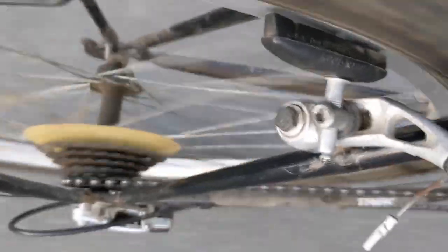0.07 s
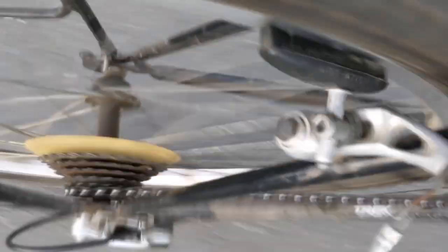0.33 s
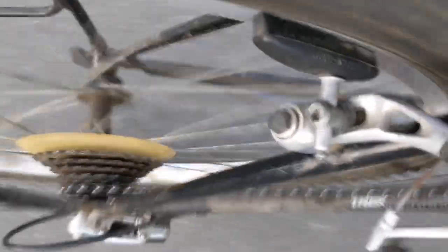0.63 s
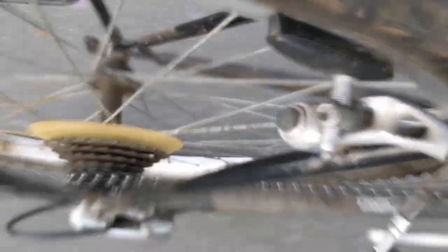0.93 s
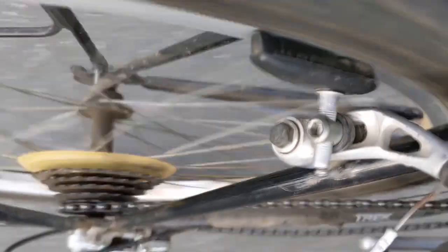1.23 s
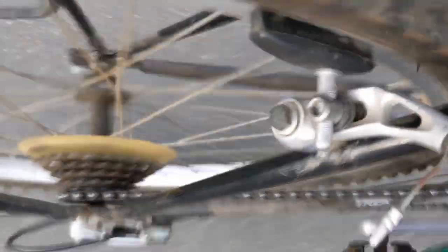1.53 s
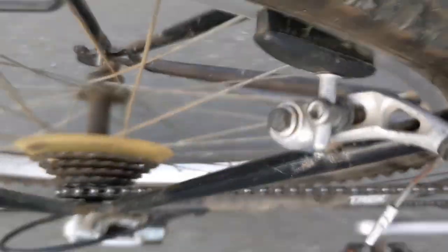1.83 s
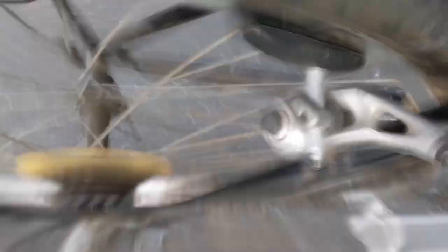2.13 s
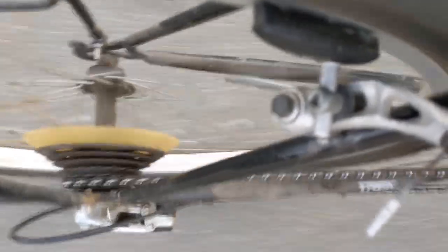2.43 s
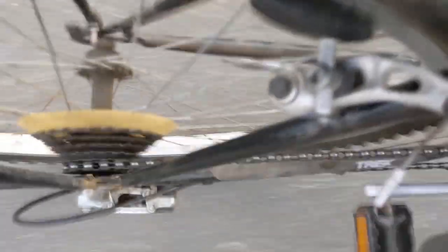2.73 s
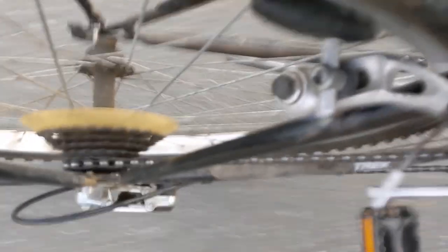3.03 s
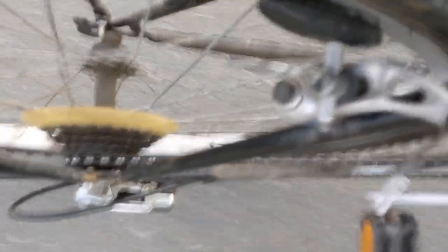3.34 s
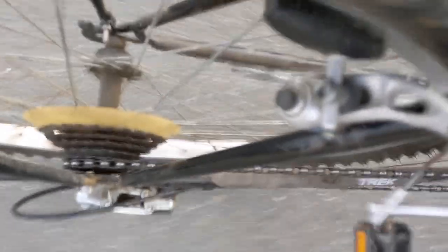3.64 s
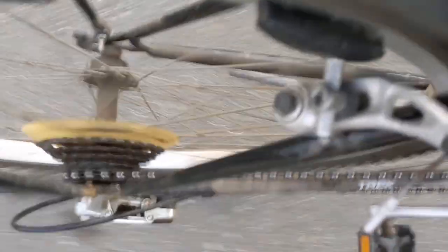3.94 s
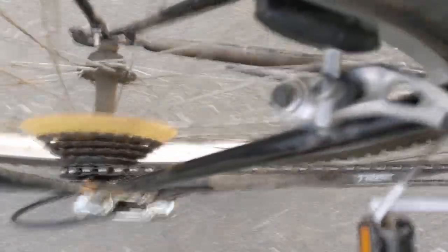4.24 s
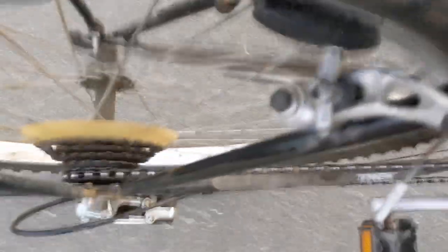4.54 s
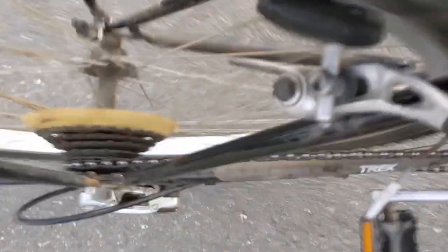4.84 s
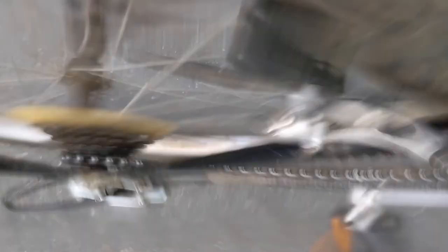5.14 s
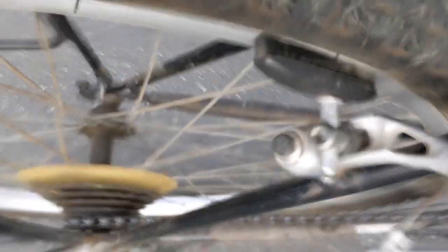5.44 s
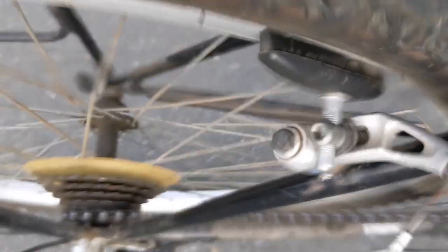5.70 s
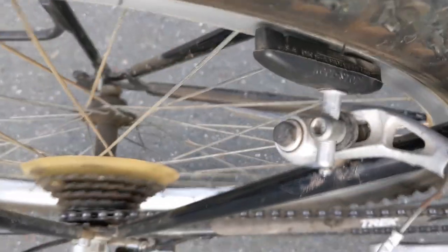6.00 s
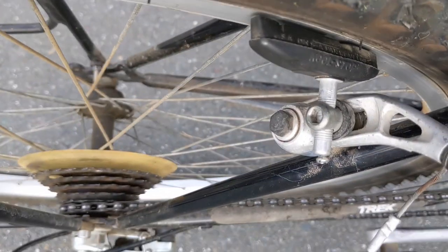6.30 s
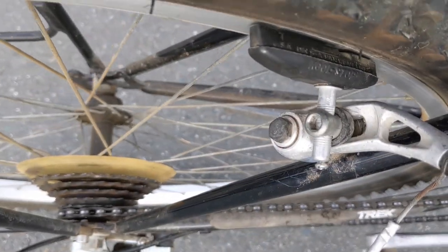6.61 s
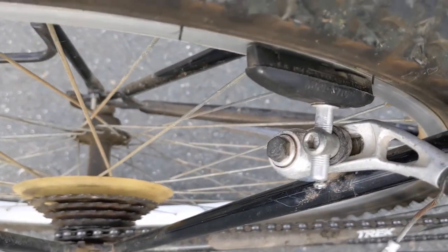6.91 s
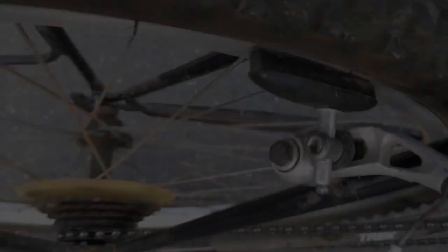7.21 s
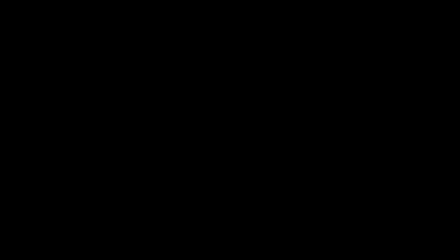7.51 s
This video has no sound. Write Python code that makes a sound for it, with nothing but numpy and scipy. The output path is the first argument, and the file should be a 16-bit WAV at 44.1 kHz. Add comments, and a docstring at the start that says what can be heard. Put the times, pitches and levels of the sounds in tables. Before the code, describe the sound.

A bicycle coasts over pavement, heard close to the rear wheel. From the start, wind buffets the microphone in low, uneven gusts, mostly on the left, while the freewheel ticks quickly and faintly and the loose chain jingles toward the right. The brake pad rubs the rim five times with a gritty hiss, at about 0.7, 1.5, 2.7, 4.2 and 5.4 seconds, each lasting between a third of a second and a second. Bumps slap the chain against the frame with a steely clatter, near 1.1 seconds, in a cluster just after 2, at 3.7 and again from 4.8 to 5.2. The ticking slows slightly and stops just before 6 seconds as the wind dies. Quiet outdoor air remains, with soft puffs, faint swishes and a few small clicks. After 7 seconds come a brief scratch, a sharp finger knock on the microphone and a last click.

```python
"""A bicycle coasts over pavement with the microphone held beside its rear wheel.
From the start, wind buffets the microphone's two openings (ports), the freewheel ticks
and the loose chain jingles. Then the brake pad rubs the rim five times, while bumps throw
the chain against the frame. The ticking slows and the bicycle stops. Last come soft puffs
and swishes, a few small clicks and the knocks of fingers on the microphone's case."""
import sys
import numpy as np
from scipy import signal
from scipy.fft import rfft, irfft, next_fast_len
from scipy.io import wavfile

SR = 44100
rng = np.random.default_rng(int(sys.argv[2]) if len(sys.argv) > 2 else 0)


def wav_record(signal):
    """Record a signal, one row per channel, as 16-bit PCM in the file named by sys.argv[1]."""
    frames = np.transpose(np.atleast_2d(signal))
    bounded = np.clip(frames, -1, 1)
    # unit amplitude maps onto the largest positive 16-bit level
    quanta = np.round(bounded * 32767).astype(np.int16)
    wavfile.write(sys.argv[1], SR, quanta)


N = 337806
TIME, FREQS = np.arange(N) / SR, np.fft.rfftfreq(next_fast_len(N), 1 / SR)
LEFT, RIGHT = 0, 1
SIDES = np.array([[.5], [-.5]])   # shares out a pan_db: above 0 leans left, below 0 leans right


def from_db(db):
    """Turn decibels into a number to multiply by."""
    return 10 ** (np.asarray(db) / 20)


def unit_power(x):
    """Scale a signal so its average power is 1."""
    return x / np.sqrt(np.mean(x ** 2) + 1e-20)


def in_time(rows):
    """Join a table's points in time with straight lines, one curve per column."""
    times, *columns = np.transpose(rows)
    return [np.interp(TIME, times, column) for column in columns]


def at_hz(points):
    """Join a table's points along the pitch axis, every octave equally wide."""
    pitches, values = np.transpose(points)
    return np.interp(np.log(FREQS + 1), np.log(pitches), values)


def filtered(x, response):
    """Make each frequency louder or softer."""
    size = next_fast_len(N)
    return irfft(rfft(x, size) * response, size)[..., :N]


def pass_filter(x, hz, kind, order):
    """Keep the "low" or the "high" side of a frequency."""
    return signal.sosfilt(signal.butter(order, hz, kind, fs=SR, output="sos"), x)


def white():
    """Separate white noise for left and right."""
    return rng.standard_normal((2, N))


def drift(rate_hz):
    """A smooth random wobble for each side, about 1 in size."""
    return unit_power(filtered(white(), 1 / (1 + (FREQS / rate_hz) ** 2)))


def colour(spectrum, balance, body=1):
    """A stereo filter made of a tone colour, a lean to one side and a ringing body."""
    response = from_db(at_hz(spectrum) + SIDES * at_hz(balance)) * body
    return response / np.sqrt(np.mean(np.abs(response) ** 2))


def held(start_s, length_s, rise_s, fall_s):
    """Rise from 0 to 1, hold, and fall back."""
    end_s = start_s + length_s
    return np.interp(TIME, [start_s - rise_s, start_s, end_s, end_s + fall_s], [0, 1, 1, 0])


def spells(rest_db, rows, rise_s, fall_s):
    """A level in dB that leaves its rest for each row, slides evenly and falls back."""
    level = rest_db
    for start_s, length_s, first_db, last_db in rows:
        slide = np.interp(TIME, [start_s, start_s + length_s], [first_db, last_db])
        level = level + held(start_s, length_s, rise_s, fall_s) * (slide - level)
    return level


# loudness of the outdoor air and tyres: time_s, level_db
STREET_LEVEL = [(5.85, -53), (6.5, -49.5), (7.2, -50), (7.58, -63)]
# their tone colour: pitch_hz, level_db
STREET_COLOUR = [(200, 4.5), (400, 6), (850, 6), (1600, -0.5), (4000, -10.5), (16000, -12.5)]
# their lean to one side: pitch_hz, pan_db
STREET_BALANCE = [(500, 1.5), (9000, -2)]

def street():
    """The open air and the tyres make a soft, steady noise."""
    return from_db(in_time(STREET_LEVEL)[0]) * filtered(white(), colour(STREET_COLOUR, STREET_BALANCE))


# soft swishes as the bicycle rolls out: middle_s, half_length_s, level_db
SWISHES = [(6.092, 0.036, -50.5), (6.228, 0.04, -50), (6.493, 0.072, -51), (7.04, 0.11, -53.5)]

def swishes(centre_hz):
    """Faint hisses swell and fade."""
    swell = sum(from_db(db) * np.exp(-.5 * ((TIME - s) / half_s) ** 2) for s, half_s, db in SWISHES)
    return swell * unit_power(filtered(white(), FREQS / (FREQS ** 2 + centre_hz ** 2)))


def closing_noise_burst(start_s, length_s, level_db, dull_hz):
    """A short, dull burst of noise at the very end."""
    noise = unit_power(filtered(white(), 1 / (1 + FREQS / dull_hz)))
    return from_db(level_db) * held(start_s, length_s, rise_s=0.0026, fall_s=.01) * noise


def grip_scratch(level_db, centre_hz):
    """The grip on the microphone shifts: a gritty scratch, then a fainter one."""
    stroke = np.interp(TIME, [7.114, 7.126, 7.138, 7.168, 7.185], [0, 1, .25, .4, 0])
    grit = white() * unit_power(from_db(6 * np.tanh(drift(190)[0])))
    band = 1 / (1 + (2 * np.log2((FREQS + 1) / centre_hz)) ** 4)   # one octave wide
    return from_db(level_db) * stroke * unit_power(filtered(grit, band))


# ticks of the drivetrain and the grip: start_s, peak_db, low_edge_hz, high_edge_hz, pan_db
CLICKS = [(5.949, -28.5, 2980, 14200, -6), (6.2739, -25, 600, 9000, -8), (6.664, -40, 6500, 13900, -19),
          (6.7821, -24, 5100, 14100, -22), (7.1258, -17.5, 2880, 4830, -1), (7.165, -19.5, 2900, 8000, -1),
          (7.172, -23, 2900, 7900, 2), (7.391, -12, 2300, 5400, -1)]

def clicks(rattle_db, decay_s):
    """A sharp tap on a small part, then a short rattle, with no bass."""
    out, age = np.zeros((2, N)), TIME[:4096]
    rattle = from_db(rattle_db - 60 * age / decay_s) + from_db(-31.5 - 60 * age / 0.18)
    for start_s, peak_db, low_hz, high_hz, pan_db in CLICKS:
        contact = rattle * rng.standard_normal((2, len(age)))
        contact[:, 0] += 1   # the tap itself
        click = pass_filter(contact, low_hz, "high", order=4)
        click = pass_filter(click, high_hz, "low", order=1)
        at = int(start_s * SR)
        out[:, at:at + len(age)] += click / np.abs(click).max() * from_db(peak_db + SIDES * pan_db)
    return out


# fingers knock on the microphone's case: start_s, peak_db, hardness_hz
KNOCKS = [(6.2754, -30, 1290), (7.2902, -23.5, 593), (7.328, -5.5, 3200)]
# the case's short-lived tones: pitch_hz, width_hz, level_db
CASE_TONES = [(1130, 660, 7.5), (2300, 1100, 7), (4440, 900, -6)]

def finger_knocks(rattle_db, decay_s, bass_cut_hz):
    """A blunt knock makes the case ring for a moment, the same on both sides."""
    out, age = np.zeros(N), TIME[:4096]
    for start_s, peak_db, hardness_hz in KNOCKS:
        contact = from_db(rattle_db - 60 * age / decay_s) * rng.standard_normal(len(age))
        contact[0] += 1
        contact = pass_filter(contact, hardness_hz, "low", order=2)
        contact = pass_filter(contact, bass_cut_hz, "high", order=2)
        knock = sum(from_db(db) * signal.lfilter(*signal.iirpeak(hz, hz / width_hz, fs=SR), contact)
                    for hz, width_hz, db in CASE_TONES)
        at = int(start_s * SR)
        out[at:at + len(age)] += from_db(peak_db) * knock / np.abs(knock).max()
    return out


# stray puffs of air as the bicycle comes to rest: start_s, strength_db
PUFFS = [(5.899, -28.5), (6.059, -34.5), (6.296, -32.5), (6.382, -31), (6.649, -39)]

def air_puffs(level_db, swell_s, dull_hz, pan_db):
    """Single slow swirls of air thump softly on one port."""
    swell = np.zeros(N)
    for start_s, strength_db in PUFFS:
        age = np.maximum(TIME - start_s, 0) / swell_s
        swell += from_db(strength_db) * age * np.exp(1 - age)
    bass = FREQS / np.hypot(FREQS, 40) / (1 + (FREQS / dull_hz) ** 3)
    return from_db(level_db + SIDES * pan_db) * unit_power(filtered(white(), bass)) * swell


# the smooth flow of air, which rises and dies with the ride: time_s, left_db, right_db
AIRFLOW = [(0, -18, -26), (1.2, -29, -24.5), (1.8, -2.5, -22.5), (2.2, -21, -30), (2.7, -13, -19.5),
           (3.8, -18, -26.5), (4.3, -13, -31), (4.55, -31, -29), (5.3, -25.5, -34), (5.75, -42, -27),
           (6.05, -52, -40.5), (7.1, -47.5, -47.5), (7.55, -61, -56)]
# gusts: start_s, length_s, rumble_db, buffet_db (how rough it is), port
GUSTS = [(0.16, 0.013, -21, -9.5, LEFT), (0.288, 0.87, -21.5, -6.5, LEFT), (0.93, 0.2, -17.5, -8, LEFT),
         (1.249, 0.048, -19, -1.5, LEFT), (1.325, 0.25, -15, -8, LEFT), (1.597, 0.055, -15, -9, LEFT),
         (1.713, 0.019, -15.5, -5.5, LEFT), (1.764, 0.2, -9, -17, LEFT), (2.291, 0.22, -12.5, -8, LEFT),
         (2.538, 0.025, -21, 2, LEFT), (2.689, 0.24, -15.5, -6.5, LEFT), (2.964, 0.34, -13, -6, LEFT),
         (3.373, 0.18, -16, -9, LEFT), (3.625, 0.094, -18, -8, LEFT), (3.841, 0.072, -12, -11, LEFT),
         (3.92, 0.11, -10, -18.5, LEFT), (4.07, 0.0089, -15.5, -13.5, LEFT),
         (4.222, 0.17, -14.5, -13, LEFT), (4.968, 0.26, -20, -18.5, LEFT), (5.909, 0.027, -28, -22, LEFT),
         (1.36, 0.078, -13, -22.5, RIGHT), (1.986, 0.017, -18, -11.5, RIGHT),
         (2.279, 0.2, -13, -19.5, RIGHT), (2.642, 0.1, -13.5, -23, RIGHT),
         (3.077, 0.21, -19.5, -16.5, RIGHT), (4.917, 0.018, -10.5, -28.5, RIGHT)]

def airflow(calm_buffet_db):
    """Rumble and buffeting at each port, in dB; a gust buffets hardest as it arrives."""
    rumble, buffet = np.array(in_time(AIRFLOW)), np.full((2, N), float(calm_buffet_db))
    for start_s, length_s, rumble_db, buffet_db, port in GUSTS:
        gust = held(start_s, length_s, rise_s=0.011, fall_s=0.051)
        front_db = 4.5 * np.exp(-np.maximum(TIME - start_s, 0) / 0.048)
        rumble[port] += gust * (rumble_db - rumble[port])
        buffet[port] += gust * (buffet_db + front_db - buffet[port])
    return rumble, buffet


# tone colour of the wind: pitch_hz, level_db
WIND_COLOUR = [(20, -0.5), (45, 1), (80, -1), (150, -4.5), (300, -12), (600, -17), (1000, -24.5),
               (1600, -37.5), (3000, -57), (6000, -84.5)]

def wind(flutter_db, swirl_db, usual_buffet_db, calm_buffet_db):
    """Swirls of air strike each port; sharper swirls sound brighter, and the whole flow flutters."""
    rumble_db, buffet_db = airflow(calm_buffet_db)
    sharpness_db = buffet_db - usual_buffet_db + swirl_db * np.tanh(drift(140))
    shape = unit_power(from_db(at_hz(WIND_COLOUR)) * FREQS / np.hypot(FREQS, 15))
    air, out = filtered(white(), shape), 0
    centres = np.log(60 * 2. ** np.arange(6))   # six octaves, from 60 Hz up
    for k, share in enumerate([.1, .25, .7, 1, 1.2, 1.35]):   # high octaves follow sharpness most
        octave = np.interp(np.log(FREQS + 1), centres, np.arange(len(centres)) == k)
        out = out + filtered(air, octave) * from_db(share * sharpness_db)
    return out * from_db(rumble_db + flutter_db * np.tanh(drift(28)))


# the freewheel ticks more slowly as the wheel loses speed: time_s, ticks_per_s, level_db
FREEWHEEL = [(0.3, 49.8, -39.5), (1.3, 45.6, -39), (3.9, 40.9, -34), (5.4, 38.6, -35)]

def freewheel(one_tick_at_s, stop_s, decay_s, pan_db, uneven_db):
    """Small catches drop over the ratchet's teeth in thin ticks, no two equally strong."""
    ticks_per_s, level_db = in_time(FREEWHEEL)
    teeth_passed = np.cumsum(ticks_per_s) / SR
    since_tick_s = (teeth_passed - teeth_passed[int(one_tick_at_s * SR)]) % 1 / ticks_per_s
    ticks = from_db(level_db - 60 * since_tick_s / decay_s + uneven_db * drift(17)[0]) * (TIME < stop_s)
    tone = from_db(at_hz([(5000, -6.5), (9000, -11.0), (15000, -5)]))
    return from_db(SIDES * pan_db) * filtered(white() * ticks, tone)


def spokes(share, decay_s):
    """A filter: the wheel's many weak, close tones colour the sound passing through it."""
    ringing = white() * from_db(-60 * np.minimum(TIME / decay_s, 3))
    return 1 + share * rfft(ringing, next_fast_len(N)) / np.sqrt(np.sum(ringing[0] ** 2))


# ringing tones of the sprockets, spokes and frame: pitch_hz, width_hz, level_db
STEEL_TONES = [(1128, 41, 4.5), (1326, 17, 0.5), (2332, 22, 2), (2974, 55, 2), (3455, 23, -0.5),
               (4407, 130, 1.5), (4840, 28, -3.5), (5080, 98, 2.5), (6200, 51, -2), (6770, 110, -1)]

def steel(ring_db, damping):
    """A filter: the contact itself plus ringing steel; more damping makes the ring shorter."""
    tones = 0
    for k, (hz, width_hz, db) in enumerate(STEEL_TONES):
        phase = np.array([[1j * (-1) ** k], [1]])   # left and right are a quarter cycle apart
        tones = tones + phase * (from_db(db) / (1 + 2j * (FREQS - hz) / (width_hz * damping)))
    return 1 + from_db(ring_db) * tones


# rough pavement shakes the loose chain: start_s, length_s, first_db, last_db
ROUGH_STRETCHES = [(0.068, 2.6, -47, -52.5), (1.375, 1.35, -47, -40), (2.672, 1.08, -31.5, -46),
                   (4.263, 0.45, -25, -38.5)]
# the chain brushes the sprockets and sets them ringing: start_s, level_db
JINGLES = [(0.094, -33.5), (0.398, -42), (0.606, -38.5), (1.241, -45), (2.321, -38.5), (2.436, -34.5),
           (2.55, -32), (4.065, -33)]
# tone colour of the jingle: pitch_hz, level_db
JINGLE_COLOUR = [(1000, -1.5), (2350, 2.5), (3400, -6), (4700, 0), (6000, -9.5), (11000, -9.5),
                 (16000, -24.5)]
# the chain's lean to one side, for jingles and slaps: pitch_hz, pan_db
CHAIN_BALANCE = [(400, 0.5), (1300, -1), (2400, -7.5), (8000, -9.5), (15000, -15.5)]

def chain_jingle(touches_per_s, touch_s, ring_db, pan_db):
    """Light, random touches of the chain blend into a shimmer; firmer ones ring out in spurts."""
    touches = (rng.random(N) < touches_per_s / SR) * rng.random(N)
    shimmer = signal.lfilter([1], [1, -np.exp(-1 / (touch_s * SR))], touches + 1e-18)   # each one fades
    shake = from_db(spells(rest_db=-84.5, rows=ROUGH_STRETCHES, rise_s=0.056, fall_s=0.2))
    spurts = sum(from_db(db) * (TIME > s) * np.exp(-np.abs(TIME - s) / (2 * touch_s))
                 for s, db in JINGLES)
    links = white() * (unit_power(shimmer) * shake + spurts) * from_db(SIDES * pan_db)
    body = steel(ring_db, damping=0.7) * spokes(share=1.0, decay_s=0.011)
    return filtered(links, colour(JINGLE_COLOUR, CHAIN_BALANCE, body))


# the chain slaps the frame: start_s, strength_db, clatter_s
SLAPS = [(1.071, -13.5, 0.0018), (1.102, -5, 0.0029), (2.0664, -9.5, 0.011), (2.099, -6.5, 0.036),
         (2.133, -5, 0.008), (2.169, -6, 0.0098), (2.2262, -8.5, 0.011), (2.262, -17.5, 0.0044),
         (2.775, -17.5, 0.041), (3.6985, -10.5, 0), (4.119, -20.5, 0.002), (4.779, -3.5, 0),
         (4.919, -9.5, 0.0015), (4.955, -16.5, 0.016), (4.986, -5, 0.06), (5.065, -8, 0.013),
         (5.1212, -7.5, 0.006), (5.159, -15.5, 0.0062), (5.1975, -9, 0.0026), (5.236, -14, 0),
         (5.678, -17.5, 0.023)]
# tone colour of a slap: pitch_hz, level_db
SLAP_COLOUR = [(150, -1), (300, 11.5), (700, 5), (1150, 0), (1600, -2.5), (2100, 3), (3600, -1.5),
               (4700, 2), (6000, 0), (8500, -0.5), (11300, 3.5), (16000, -12.5)]

def chain_slaps(level_db, shower_s, tail_s, tail_db, split_hz, grain_db, ring_db, clash_db):
    """Each slap is a short, bright shower of links hitting; the steel rings on with a duller tail."""
    shower_power, tail_power, age = np.zeros(N), np.zeros(N), TIME[:SR // 2]
    for start_s, db, clatter_s in SLAPS:
        at, fading_s = int(start_s * SR), np.maximum(age - clatter_s, 0)
        shower_power[at:at + len(age)] += from_db(db - 60 * (fading_s / shower_s) ** 1.29) ** 2
        tail_power[at:at + len(age)] += from_db(db + tail_db - 60 * fading_s / tail_s) ** 2
    links = white() * unit_power(from_db(grain_db * drift(430)[0])) * np.sqrt(shower_power)
    wheel = spokes(share=0.4, decay_s=0.11)
    shower = filtered(links, colour(SLAP_COLOUR, CHAIN_BALANCE, wheel * steel(ring_db, damping=0.64)))
    # squaring lets only the hardest slaps clash
    clash = from_db(clash_db) * pass_filter(white() * shower_power ** 2, split_hz, "high", order=1)
    dull_body = wheel * steel(ring_db=8, damping=1.1) / (1 + (FREQS / split_hz) ** 4)
    tail = filtered(white() * np.sqrt(tail_power), colour(SLAP_COLOUR, CHAIN_BALANCE, dull_body))
    return from_db(level_db) * (shower + clash + tail)


# the released brake pad still drags faintly on the rim: time_s, level_db
PAD_DRAG = [(0, -51.5), (1.3, -47.5), (2.5, -42), (3.85, -61), (4.12, -42), (4.9, -52.5), (5.85, -59),
            (7.5, -63)]
# the pad is squeezed against the rim: start_s, length_s, first_db, last_db
SQUEEZES = [(0.723, 0.33, -25, -25.5), (1.549, 0.64, -22, -24), (2.736, 0.98, -25, -27),
            (4.22, 0.557, -29, -24.5), (5.403, 0.35, -25.5, -36.5)]

def pad_pressure():
    """How strongly the pad rubs, in dB: a faint drag between firm squeezes."""
    return spells(in_time(PAD_DRAG)[0], SQUEEZES, rise_s=0.084, fall_s=0.031)


def brake_rasp(level_db, centre_hz, grain_db, fade_db_per_s):
    """The pad catches and slips in a coarse scrape, less so as the wheel slows."""
    band = 1 / (1 + (2 * np.log2((FREQS + 1) / centre_hz)) ** 4)
    slips = white() * from_db(grain_db * np.tanh(drift(70)[0]))
    return unit_power(filtered(slips, band)) * from_db(level_db + pad_pressure() - fade_db_per_s * TIME)


# tone colour of the rub: pitch_hz, level_db
RUB_COLOUR = [(150, -7), (290, 5.5), (480, 1), (740, -5.5), (1000, 11.5), (1300, 7), (1600, -1),
              (2050, -5.5), (2500, 0), (4000, 0.5), (5100, -1.5), (6000, -7.5), (8000, -10), (11300, -6),
              (16000, -18.5)]
# its lean to one side: pitch_hz, pan_db
RUB_BALANCE = [(600, 0), (1050, 5.5), (2000, -2), (3500, -0.5), (5500, -3.5), (9000, -6), (15000, -11)]
# how alike left and right are: pitch_hz, likeness (1 the same, -1 opposite)
RUB_LIKENESS = [(400, 0.74), (750, -0.29), (1200, -0.95), (2000, 0.41), (3300, 0.23), (6000, 0.084)]
# the rub brightens, then dulls as the brake slows the wheel: time_s, treble_db
RUB_TREBLE = [(0.7, -5.5), (3.4, 3.5), (4.5, -2), (5.65, -9.5)]

def brake_rub(level_db, grit_db, waver_db):
    """Rubber scrapes the rim with a hiss that rings through the wheel; grit roughens it."""
    likeness = at_hz(RUB_LIKENESS)
    shared, opposite = white()
    shared = filtered(shared, np.sqrt(1 + likeness))
    opposite = 2 * SIDES * filtered(opposite, np.sqrt(1 - likeness))
    scrape_db = pad_pressure() + grit_db * drift(400)[0] + waver_db * drift(20)[0]
    scrape = unit_power(shared + opposite) * from_db(scrape_db)
    wheel = steel(ring_db=-9.0, damping=1.0) * spokes(share=0.44, decay_s=0.11)
    hiss = filtered(scrape, colour(RUB_COLOUR, RUB_BALANCE, wheel))
    treble = filtered(hiss, FREQS ** 2 / (FREQS ** 2 + 5000 ** 2))
    return from_db(level_db) * (hiss + treble * (from_db(in_time(RUB_TREBLE)[0]) - 1))


def scene():
    """Add up the wind, the bicycle, the small noises and the street."""
    mix = wind(flutter_db=3.0, swirl_db=10.0, usual_buffet_db=-8.0, calm_buffet_db=-19.5)
    mix += air_puffs(level_db=-8, swell_s=0.016, dull_hz=91, pan_db=-22.5)
    mix += brake_rub(level_db=1.0, grit_db=1.4, waver_db=1.5)
    mix += brake_rasp(level_db=-7, centre_hz=2000, grain_db=6.5, fade_db_per_s=3.0)
    mix += chain_slaps(level_db=-7.5, shower_s=0.035, tail_s=0.18, tail_db=-8.0, split_hz=7000,
                       grain_db=2.0, ring_db=5.0, clash_db=3)
    mix += chain_jingle(touches_per_s=53, touch_s=0.016, ring_db=13, pan_db=-5)
    mix += grip_scratch(level_db=-36, centre_hz=3730)
    mix += closing_noise_burst(start_s=7.602, length_s=0.03, level_db=-45, dull_hz=600)
    mix += freewheel(one_tick_at_s=3.7425, stop_s=5.75, decay_s=0.029, pan_db=-13.5, uneven_db=-4.5)
    mix += clicks(rattle_db=-4.5, decay_s=0.011)
    mix += finger_knocks(rattle_db=-32.5, decay_s=0.038, bass_cut_hz=436)
    return mix + swishes(centre_hz=2780) + street()


def record(dry):
    """Round off the loudest peaks and cut the treble above 16000 Hz."""
    return signal.sosfilt(signal.ellip(10, .2, 80, 16000, fs=SR, output="sos"), np.tanh(dry))


dry = scene()
out = record(dry)
wav_record(out)
```